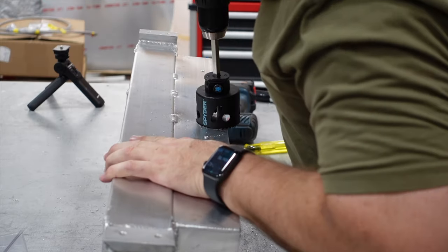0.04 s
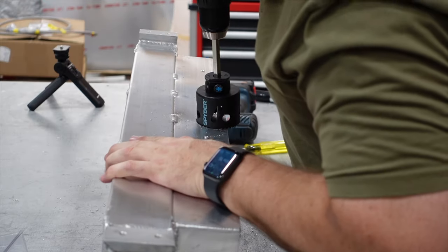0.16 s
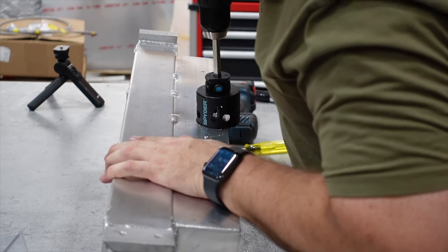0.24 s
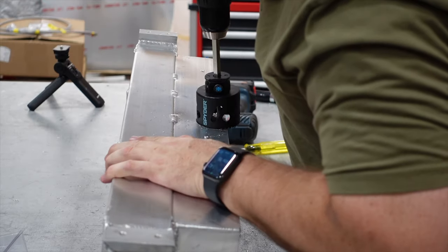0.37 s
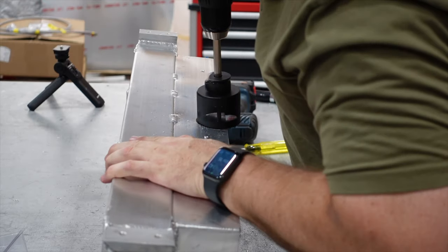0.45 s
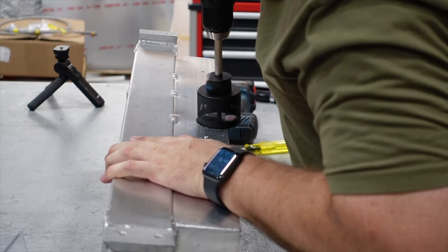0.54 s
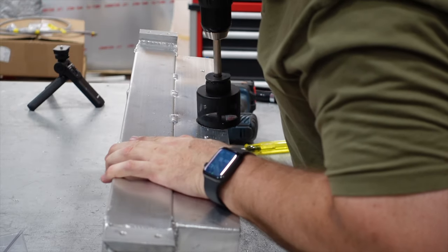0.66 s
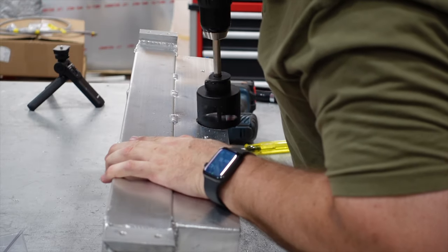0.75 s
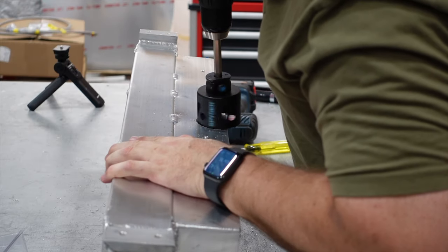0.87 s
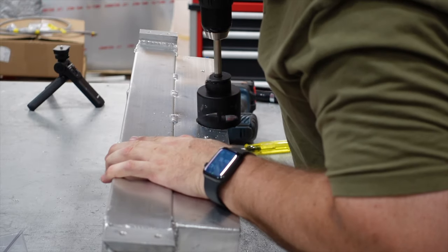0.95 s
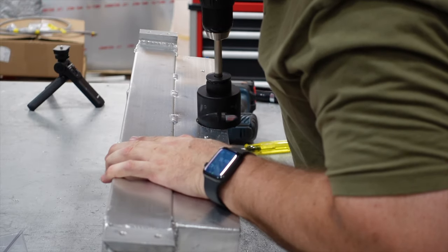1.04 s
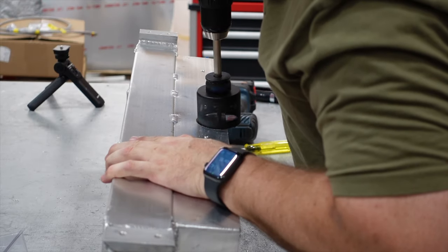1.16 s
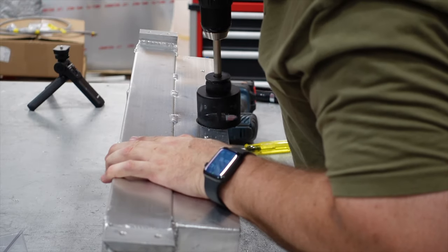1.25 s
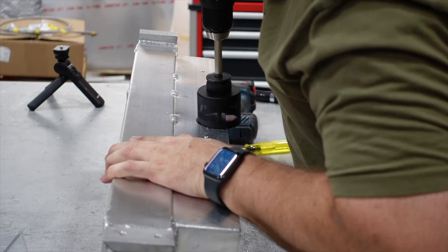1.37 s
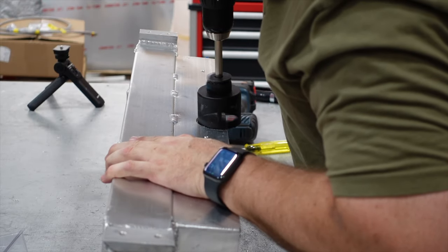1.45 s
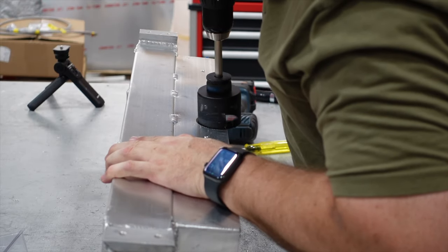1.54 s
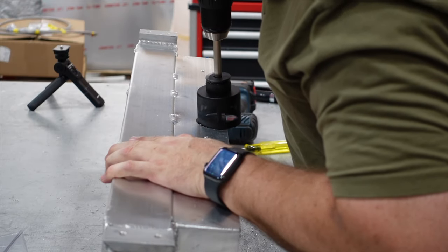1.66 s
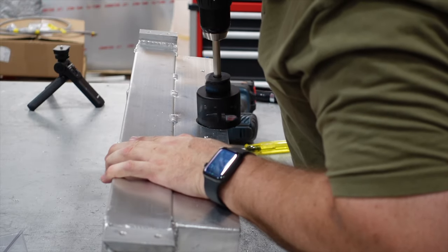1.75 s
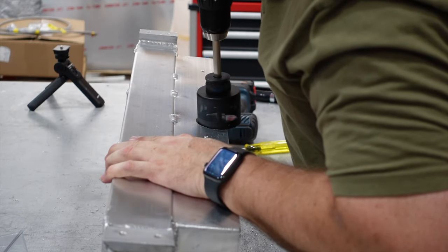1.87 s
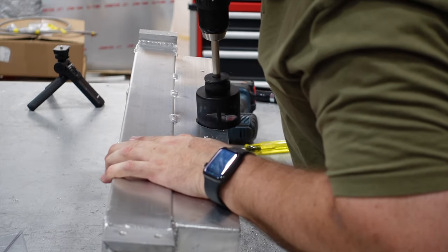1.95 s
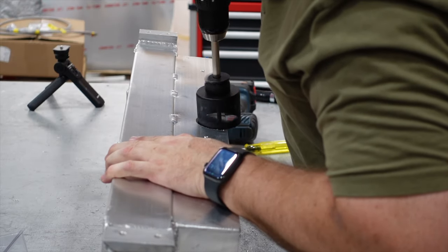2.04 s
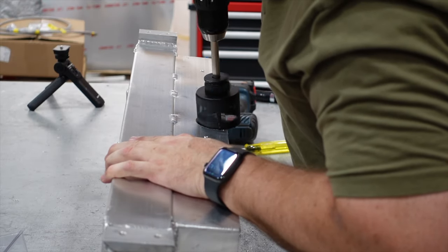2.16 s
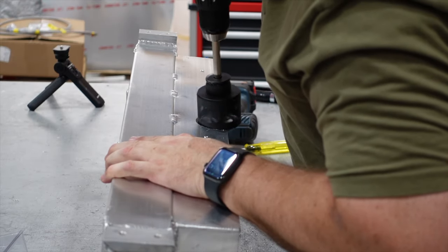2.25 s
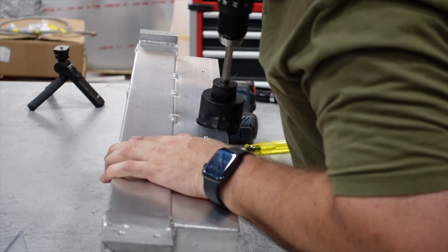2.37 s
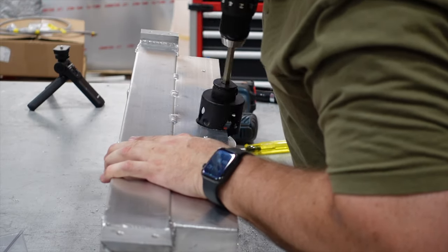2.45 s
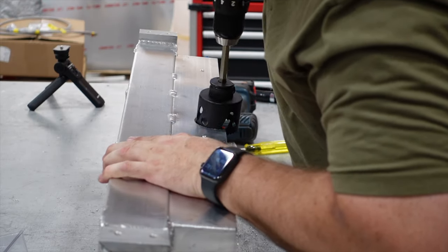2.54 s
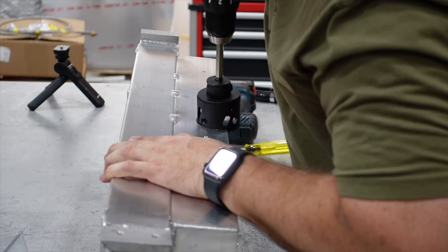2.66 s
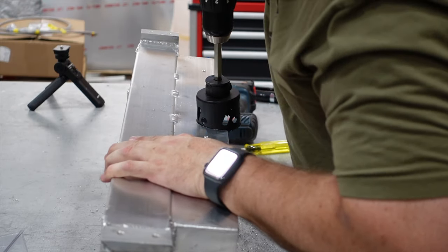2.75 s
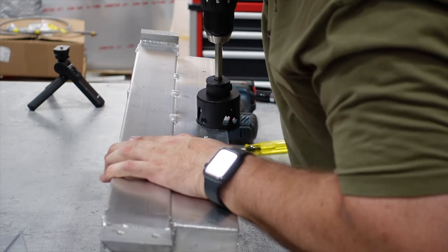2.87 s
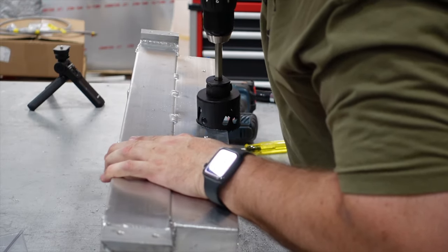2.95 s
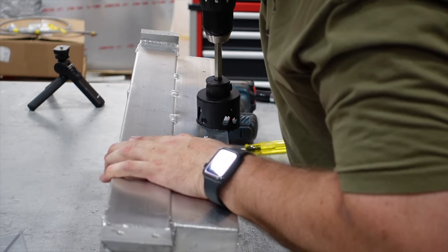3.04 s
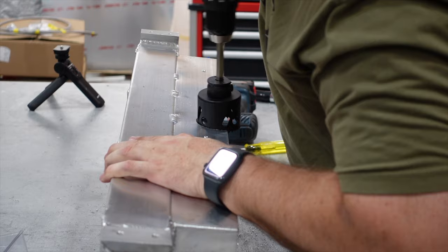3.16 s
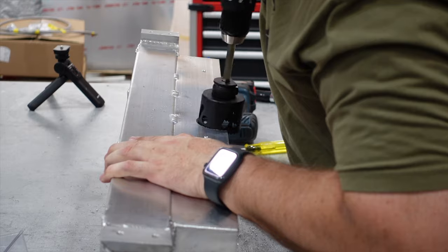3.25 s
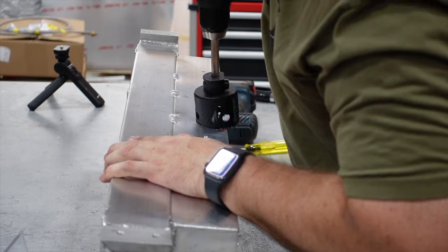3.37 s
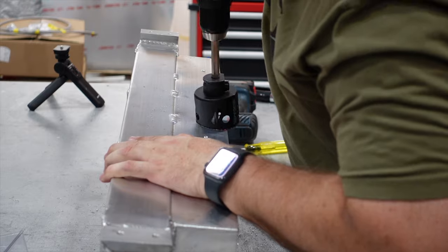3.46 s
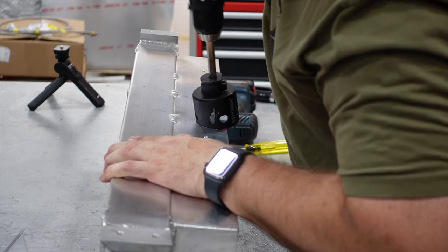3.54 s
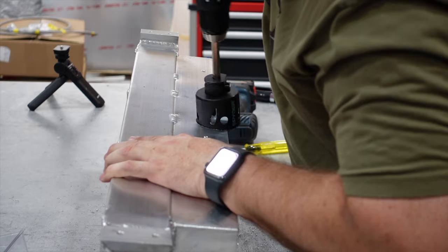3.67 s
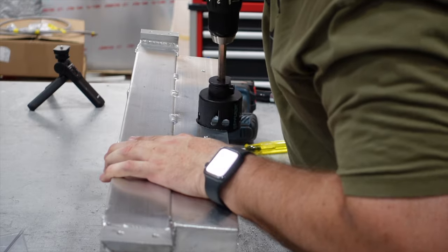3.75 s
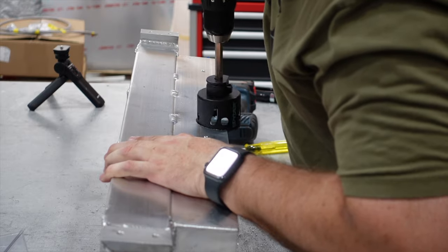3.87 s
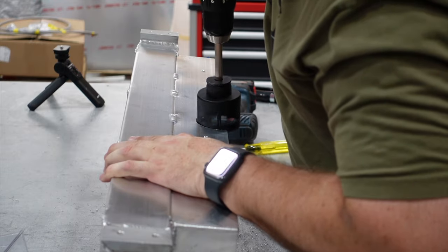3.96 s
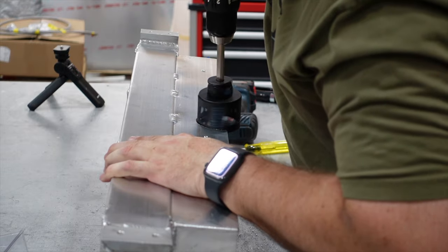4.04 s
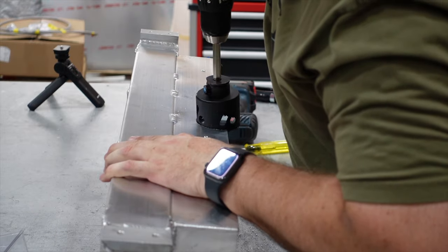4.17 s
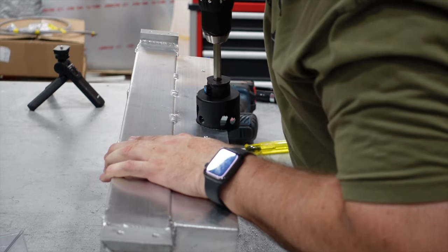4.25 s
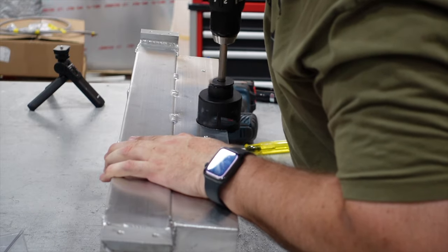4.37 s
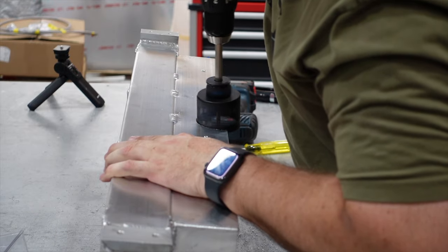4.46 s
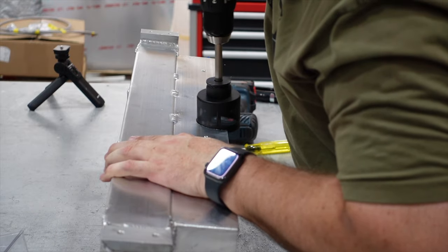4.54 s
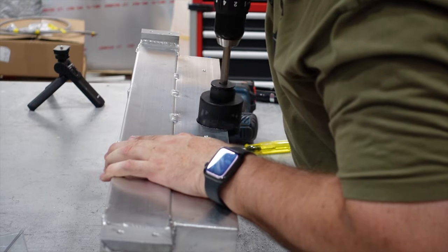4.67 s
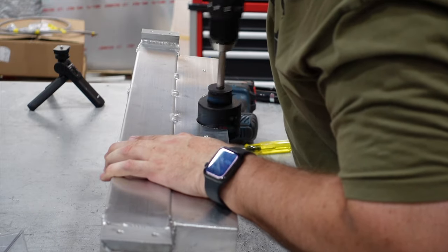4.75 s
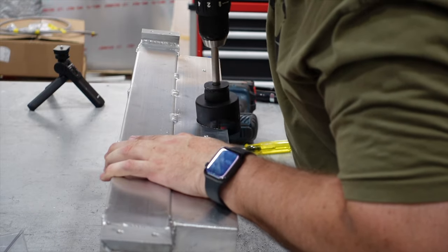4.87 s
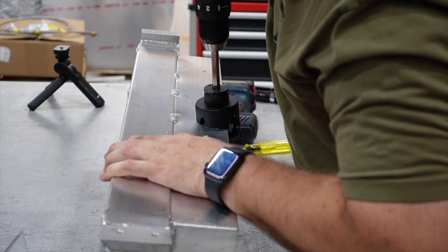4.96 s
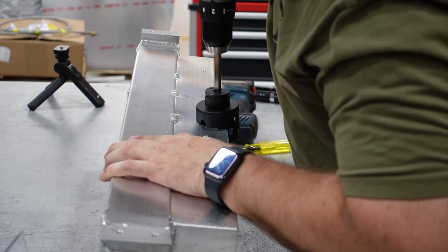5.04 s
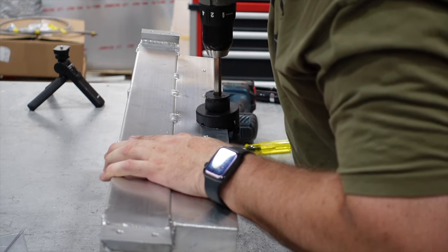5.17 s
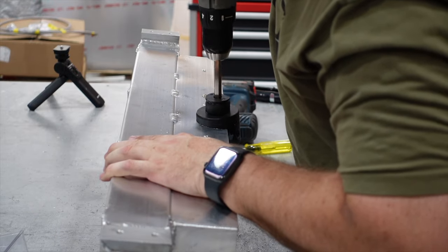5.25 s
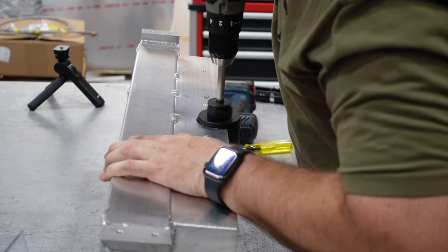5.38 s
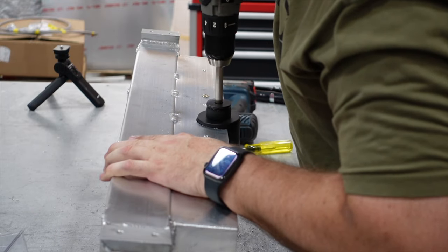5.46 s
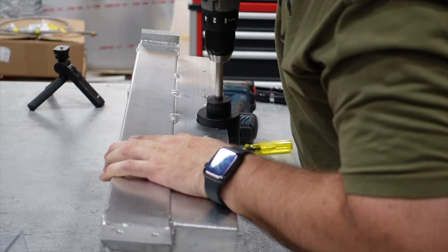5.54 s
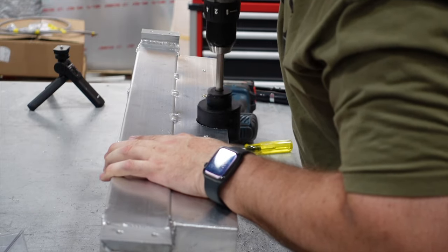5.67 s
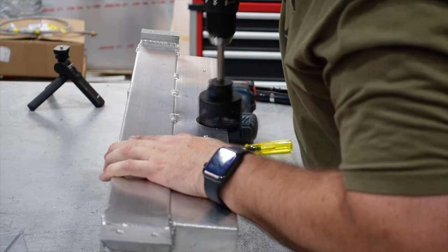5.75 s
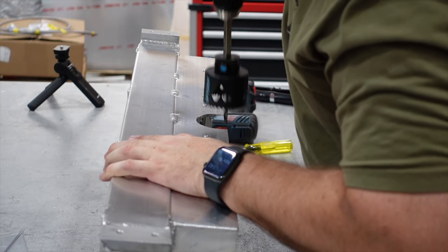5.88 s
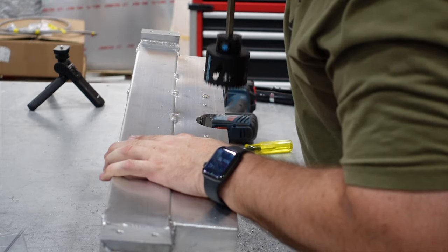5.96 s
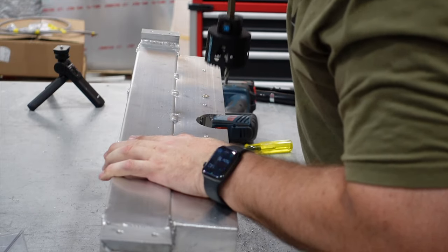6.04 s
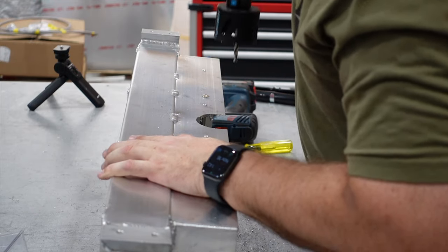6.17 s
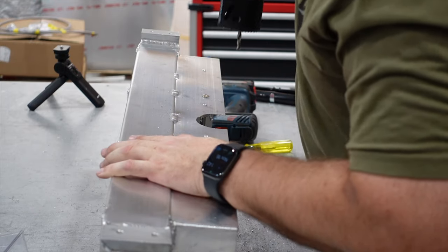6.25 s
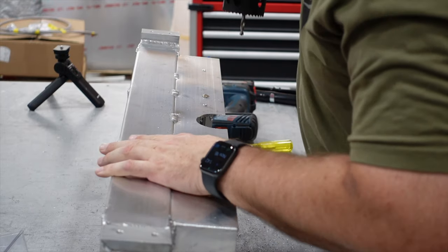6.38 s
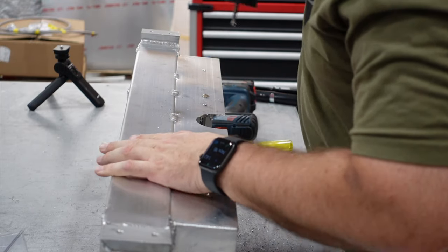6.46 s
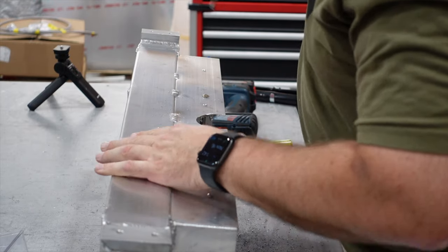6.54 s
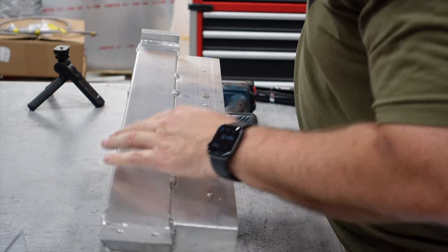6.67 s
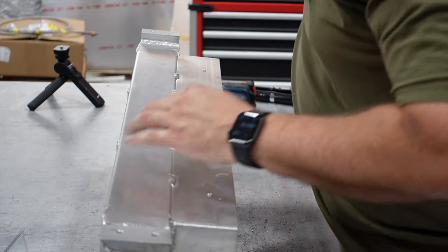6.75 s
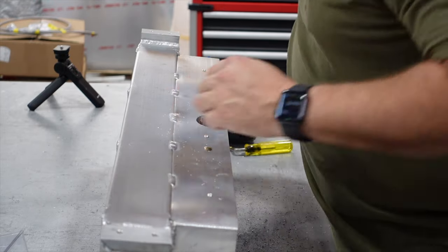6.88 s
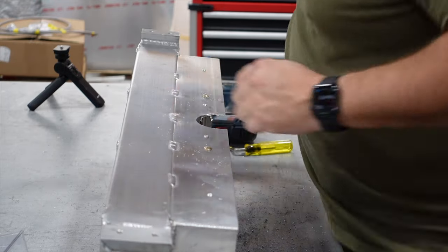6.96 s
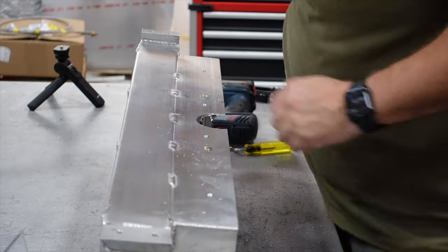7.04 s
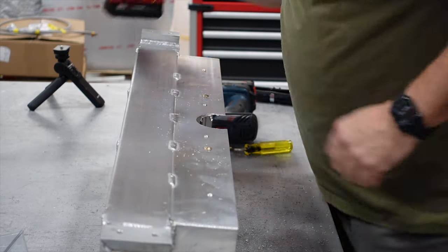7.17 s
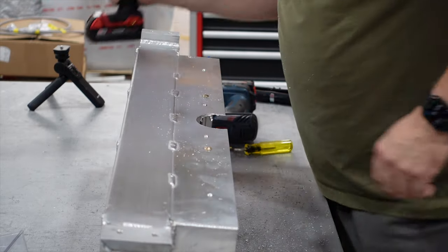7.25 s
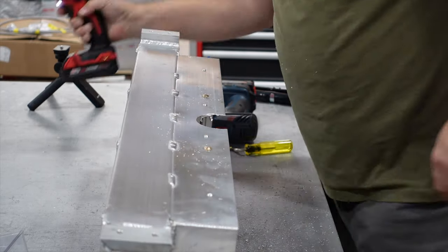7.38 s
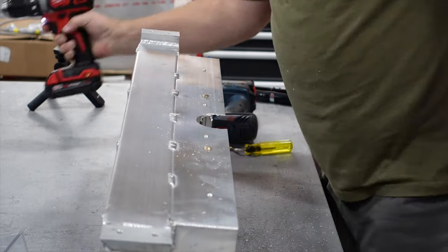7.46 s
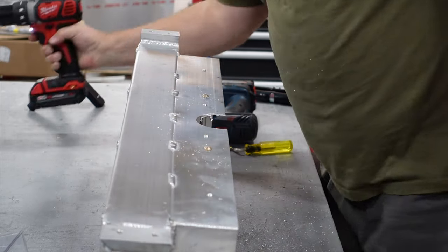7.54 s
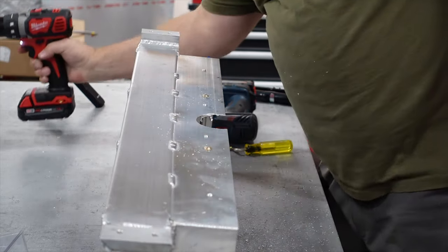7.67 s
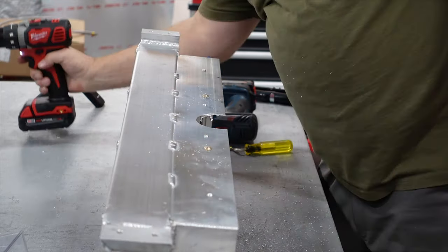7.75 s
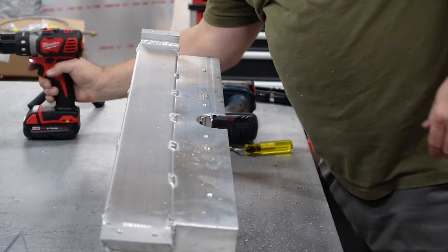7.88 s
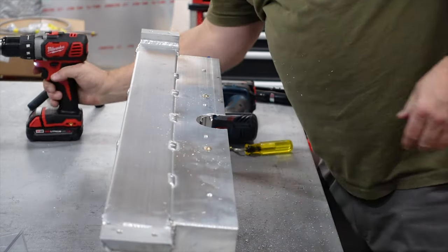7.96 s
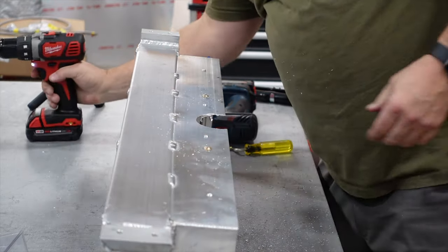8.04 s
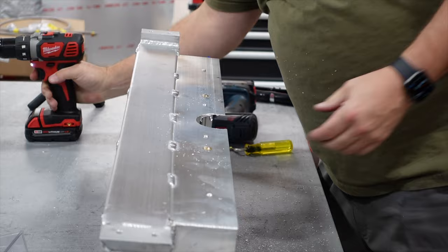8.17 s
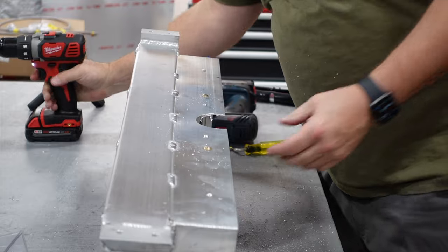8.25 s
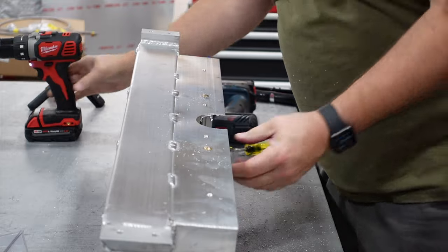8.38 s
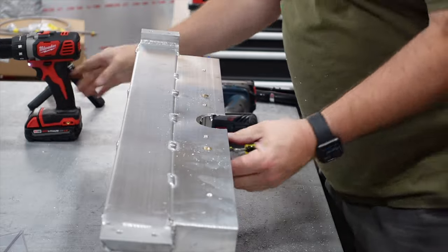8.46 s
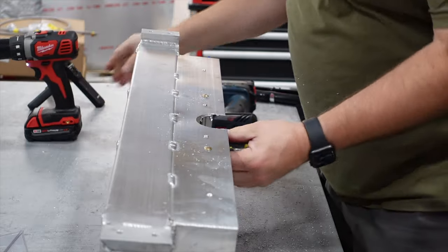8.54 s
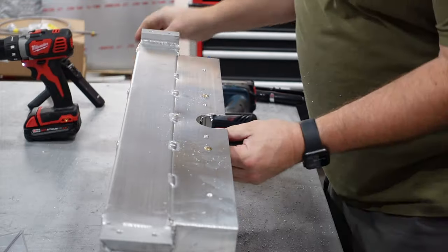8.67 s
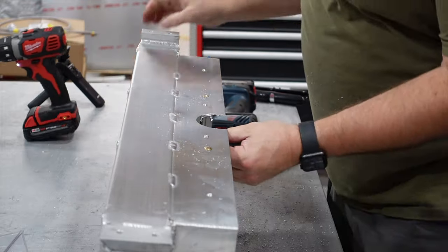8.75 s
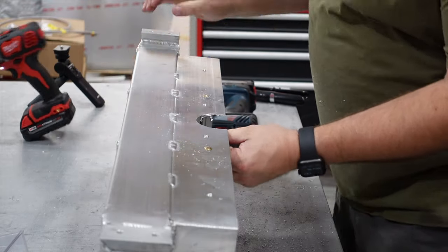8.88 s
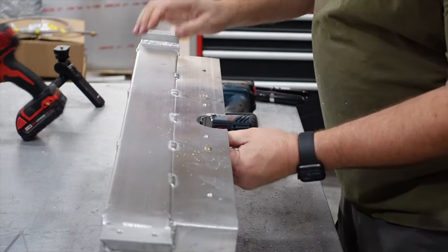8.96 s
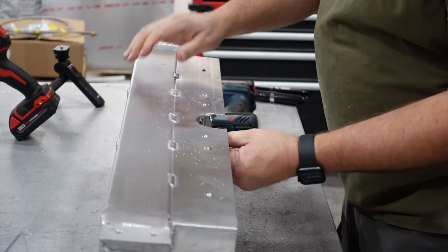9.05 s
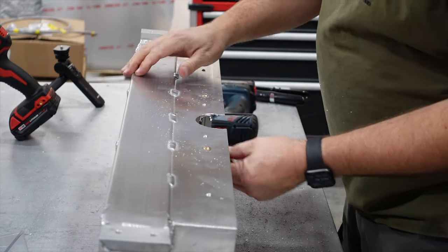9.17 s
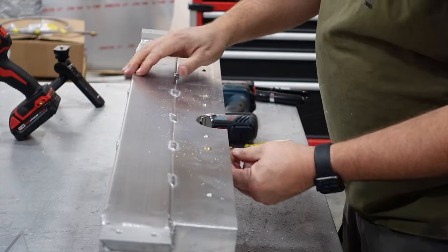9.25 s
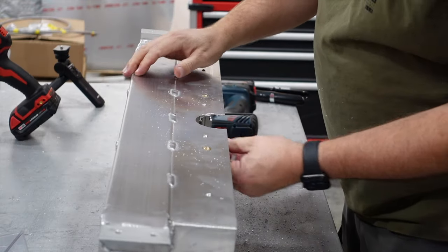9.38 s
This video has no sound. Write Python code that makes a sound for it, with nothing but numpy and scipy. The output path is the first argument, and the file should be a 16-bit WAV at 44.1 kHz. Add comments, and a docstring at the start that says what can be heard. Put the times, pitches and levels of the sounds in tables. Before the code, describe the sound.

In a slightly echoing workshop, a hole saw grinds through thin aluminum, its teeth tearing off chips with a bright hiss. The long first cut gives way to metallic clanks and bench thumps, then choppy bursts of cutting. A last, lighter cut ends in a sharp clank and a fading bell-like ring. Cloth rustles faintly, and the drill is put down with a couple of knocks before clattering over a second later.

```python
"""Hole saw through aluminium

A cordless drill drives a hole saw into a thin aluminium panel on a bench, in a hard-walled workshop.
The teeth rasp in three goes, shaking the panel and tearing off chips. They skid and clank in between,
then break through and leave the steel cup ringing. A sleeve brushes past, the drill is set down
on the bench, and a second later it topples."""
import sys
import numpy as np
from scipy import signal
from scipy.fft import rfft, irfft, next_fast_len
from scipy.io import wavfile
from scipy.ndimage import uniform_filter1d, map_coordinates

SR = 44100
rng = np.random.default_rng(int(sys.argv[2]) if len(sys.argv) > 2 else 0)


def output_pcm(signal):
    """Save a mono or channel-first signal as 16-bit PCM at the path in sys.argv[1].

    Samples are clipped to [-1, 1] before scaling.
    """
    pcm = np.clip(np.atleast_2d(signal).T, -1, 1) * 32767
    wavfile.write(sys.argv[1], SR, np.round(pcm).astype(np.int16))


N = 414981

# Pitches that the panel and the saw boost or weaken: f/Hz, width/Hz, gain/dB
PANEL_RESONANCES = [(94, 19, 13), (205, 92, 4.5), (323, 120, 3), (358, 8.3, 10), (482, 21, 8), (729, 38, 5),
                    (760, 35, -3), (887.6, 26, 8), (1005, 30, 4), (1281, 60, 6), (1582, 54, 5),
                    (2083, 37, -7), (2360, 150, 1.5), (2670, 280, -3.5), (3100, 200, 2), (4080, 50, -6.5),
                    (4440, 120, 1.5)]
SAW_RESONANCES = [(5060, 38, 6), (6120, 59, 7.5), (6680, 140, 9), (7100, 91, 7.5), (8420, 310, 3.5),
                  (10800, 530, 2.5), (12150, 510, 4), (13850, 490, 5.5), (14700, 200, 3), (15450, 300, 1.5)]
# Tone colour of tearing chips and of a clank: f/Hz, level/dB
CHIP_SPECTRUM = [(1000, -40), (3000, -2.5), (5200, 6.5), (6500, -2.5), (8300, 0.5), (9800, -2),
                 (12300, -5.5), (13200, -11.5), (16000, -11.5)]
CLANK_SPECTRUM = [(40, -30), (150, -1.5), (400, -2.5), (900, 6.5), (1500, 7.5), (3600, 3.5), (4800, -13),
                  (8000, -30.5), (15000, -36)]
# Each push on the drill: start/s, ease-off/s, grinding/dB, chips/dB, fade/(dB/s)
PUSHES = [(.443, 0.88, -14.5, -22.5, 232.5), (0.958, 2.42, -14.5, -21, 197),
          (2.386, 2.558, -18.5, -35, 52.5), (3.924, 4.078, -13.5, -21.5, 72.5),
          (4.321, 4.57, -15, -21, 399), (4.569, 4.741, -13, -17.5, 402.5),
          (4.755, 4.931, -16.5, -28.5, 192), (5.345, 5.782, -25.5, -35, 248),
          (5.768, 5.854, -20.5, -21.5, 124)]
# The knock on the saw's cup as it breaks through: t/s, level/dB
CUP_HITS = [(5.785, -24)]


def amp(db):
    """Turn decibels into a gain."""
    return 10 ** (np.asarray(db) / 20)


def unit(x):
    """Scale a signal to an average power of 1."""
    return x / np.sqrt(np.mean(x ** 2) + 1e-20)


def along(points, hz):
    """Read between (f/Hz, value) points on a logarithmic frequency axis."""
    freqs, values = np.transpose(points)
    return np.interp(np.log(hz + 1), np.log(freqs + 1), values)


def wobble(rate):
    """A smooth random curve through `rate` points a second."""
    points = rng.standard_normal(int(N * rate / SR) + 4)
    return map_coordinates(points, [np.arange(N) * rate / SR])


def coloured(x, spectrum, resonances=()):
    """Give a sound a broad tone colour with narrow peaks and dips on top."""
    size = 2 * next_fast_len(N // 2 + SR // 4)
    hz = np.fft.rfftfreq(size, 1 / SR)
    peaks = sum((amp(db) - 1) / (1 + (2 * (hz - f) / width) ** 2) for f, width, db in resonances)
    gain = unit(amp(along(spectrum, hz)) * (1 + peaks))
    # make the filter ring after a sound, never before it
    cepstrum = irfft(np.log(np.maximum(gain, 1e-6)))
    cepstrum[1:size // 2] *= 2
    cepstrum[size // 2 + 1:] = 0
    return irfft(rfft(x, size) * np.exp(rfft(cepstrum)))[:N]


def add(track, s, sound):
    """Mix a sound into a track at s seconds."""
    part = track[max(round(s * SR), 0):][:len(sound)]
    part += sound[:len(part)]


def swell(s, db, rise_db_per_s, fall_db_per_s):
    """A gain that grows to its peak at s seconds and dies away."""
    t = np.arange(N) / SR - s
    slope_db = np.minimum(rise_db_per_s * t, -fall_db_per_s * t)
    return amp(db + np.maximum(slope_db, -120))


def push(start, end, fade_db_per_s, bite_s=.026):
    """The gain of one push: the teeth take hold, cut evenly, then fade as the pressure comes off."""
    t = np.arange(N) / SR
    grip = np.clip((t - start) / bite_s, 0, 1) ** 2
    return grip * amp(-fade_db_per_s * np.maximum(t - end, 0))


def rub(gain, spectrum, resonances, uneven_db, rate):
    """Uneven rubbing noise that follows a gain."""
    strokes = unit(rng.standard_normal(N) * amp(uneven_db * wobble(rate)))
    return coloured(gain * strokes, spectrum, resonances)


def room_air():
    """The room's faint, steady rumble."""
    spectrum = [(20, 1.5), (78, -1.5), (170, -9), (367, -25.5), (1140, -22), (2480, -29.5), (4000, -37),
                (5500, -40), (15000, -49.5)]  # tone colour: f/Hz, level/dB
    return amp(-61) * coloured(rng.standard_normal(N), spectrum)


def workshop(direct, gap_s=.004):
    """A sound plus its echo from the hard walls; the highest treble dies first."""
    echo_times = [(60, 0.74), (160, 0.6), (420, 0.42), (1200, 0.87), (3500, 0.89), (5000, 0.89),
                  (8000, 0.5), (15000, .28)]  # f/Hz, time to fade by 60 dB (t60)/s
    echo_levels = [(100, 2), (400, -4), (3500, -8.5), (5500, -12), (14000, -8)]  # f/Hz, echo over direct sound/dB
    hz, t, noise = signal.stft(rng.standard_normal(SR), SR, nperseg=256)
    decay = amp(-60 * t / along(echo_times, hz)[:, None])
    decay /= np.sqrt(np.mean(decay ** 2, axis=1, keepdims=True) * SR)
    tail = signal.istft(noise * decay * amp(along(echo_levels, hz))[:, None], SR, nperseg=256)[1]
    echo = signal.fftconvolve(direct, np.pad(tail, (int(gap_s * SR), 0)))[:N]
    return (direct + echo) / np.sqrt(2)


def handling():
    """A sleeve brushes by, the saw scuffs the panel and the bench rocks under a shifting load."""
    # Each movement: peak/s, level/dB, rise/(dB/s), fall/(dB/s)
    brushes = [(7.46, -50.5, 64, 92), (8.5, -70, 40, 34)]
    scuffs = [(0, -41, 300, 114), (2.85, -42.5, 197, 69), (3.85, -57, 39, 100)]
    rocks = [(.05, -60.5, 51, 5), (3.302, -33, 185.5, 29.5), (8.15, -34, 200, 133.5), (8.5, -55.5, 70, 28),
             (9.151, -30, 260, 73.5)]
    # Tone colour of cloth and bench: f/Hz, level/dB
    cloth_spectrum = [(150, -24), (300, -10), (500, -6), (800, -7.5), (1500, -2), (3500, 0), (6000, -16),
                      (14000, -28)]
    thud_spectrum = [(25, -12.5), (55, -6.5), (85, 1.5), (130, -16), (210, -2), (340, -7.5), (480, -6.5),
                     (800, -14), (2500, -74)]
    brush, scuff, rock = (sum(swell(*row) for row in rows) for rows in (brushes, scuffs, rocks))
    sleeve = coloured(brush * rng.standard_normal(N), cloth_spectrum)
    panel = rub(scuff, CLANK_SPECTRUM, PANEL_RESONANCES, uneven_db=5.5, rate=17)
    bench = rub(rock, thud_spectrum, PANEL_RESONANCES[:1], uneven_db=5, rate=9.6)
    return sleeve + panel + bench


def contacts(rattle_t60_s=.11, gap_scatter=.08, scatter_octaves=.4):
    """List every blow: single knocks, and clatters whose weakening knocks rock the bench to and fro."""
    # The tool hits panel and bench: t/s, clank/dB, crack/dB, rattle t60/s, thump/dB, thump/Hz
    knocks = [(.361, -52, -67, .04, -55, 119.2), (.418, -50, -55.5, 0.2, -59, 150),
              (2.756, -12, -11, 0.071, -41.5, 301.6), (2.9, -29, -24.5, 0.092, -76, 290),
              (2.976, -27.5, -28, 0.072, -40, 160), (3.239, -27, -34.5, 0.19, -24.5, 92),
              (3.323, -36.5, -45, 0.19, -27, 70.5), (3.348, -18, -24.5, 0.14, -21, 235),
              (3.37, -21.5, -46.5, 0.17, -18, 85.4), (3.945, -6, -13.5, 0.09, -28.5, 206),
              (4.155, -16, -25.5, 0.19, -19, 126), (4.348, -7, -13.5, 0.037, -27, 130),
              (4.506, -16, -3, 0.023, -30.5, 199), (4.893, -7, -14, .05, -37, 198),
              (5.308, -35.5, -40, 0.15, -54.5, 199), (5.352, -15.5, -21.5, .3, -12.5, 233),
              (5.412, -12.5, -14.5, 0.076, -27.5, 270), (5.636, -6.5, -8, 0.035, -37, 199),
              (5.703, -19, -16.5, 0.081, -41, 200.5), (5.784, 1.5, 0, 0.034, -31, 178.5),
              (7.853, -37.5, -51, 0.38, -17, 218), (7.967, -30.5, -50, 0.13, -14.5, 141)]
    # The drill clatters: t/s, length/s, gap/s, clank/dB, crack/dB, thump/dB, loss/(dB/s)
    clatters = [(3.589, .09, 0.035, -39.5, -53.5, -35, 10), (7.984, .085, .024, -22, -34, -18, 46),
                (9.016, .1, .015, -13.5, -22.5, -7, 83)]
    hits = list(knocks)
    for start, length, gap, clank_db, crack_db, thump_db, loss in clatters:
        for k, late in enumerate(np.arange(0, length, gap)):
            slip, tilt = rng.uniform(-1, 1, 2)
            s = start + late + gap_scatter * min(late, gap) * slip
            hz, tone_db = (100, -3.5) if k % 2 else (252, 0)  # the bench's two tones take turns
            lost_db = loss * late
            hits.append((s, clank_db - lost_db, crack_db - lost_db, rattle_t60_s,
                         thump_db + tone_db - lost_db, hz * 2 ** (scatter_octaves * tilt)))
    return hits


def bench_thumps(hits, life_cycles=8.03, boxy_db=-8):
    """Each blow shakes the bench for a few cycles and stirs its hollow body."""
    hollow = [(40, -12.5), (100, -6.5), (350, 0), (600, -9.5), (1200, -27), (3000, -57.5)]  # f/Hz, dB
    tone, stir = np.zeros((2, N))
    t = np.arange(SR // 3) / SR
    for s, _, _, _, db, hz in hits:
        cycles = hz * t
        envelope = amp(db + 13 - 60 * cycles / life_cycles) * (1 - np.exp(-cycles ** 2))
        add(tone, s, envelope * np.sin(2 * np.pi * cycles))
        add(stir, s, envelope * rng.standard_normal(len(t)))
    return tone + amp(boxy_db) * coloured(stir, hollow)


def clanks(hits, attack_s=.0029, first_db=-3, first_s=.0041):
    """Each blow is a hard first touch and a brief rattle: the panel clanks and the steel cracks."""
    clank, crack = np.zeros((2, N))
    t = np.arange(SR // 3) / SR
    onset = (1 + amp(first_db) * np.exp(-t / first_s)) * (1 - np.exp(-t / attack_s))
    for s, clank_db, crack_db, t60, _, _ in hits:
        rattle = rng.standard_normal((2, len(t))) * onset * amp(-60 * t / t60)
        add(clank, s, amp(clank_db) * rattle[0])
        add(crack, s, amp(crack_db) * rattle[1])
    jolts = unit(amp(wobble(600)))  # the touches come in clumps of a millisecond or two
    panel = amp(2.5) * coloured(clank * jolts, CLANK_SPECTRUM, PANEL_RESONANCES)
    return panel + amp(-4) * coloured(crack * jolts, CHIP_SPECTRUM, SAW_RESONANCES)


def ring(tones, hits, split_hz, twin_gain, attack_s=.00055):
    """Struck steel: each tone has a slightly out-of-tune twin, so the pair pulses."""
    track, t = np.zeros(N), np.arange(3 * SR) / SR
    attack = 1 - np.exp(-t / attack_s)
    for s, hit_db in hits:
        for hz, tone_db, t60 in tones:
            scatter_db, detune, phase = rng.standard_normal(3)
            twin_hz = hz + split_hz * (1 + .4 * detune)
            pair = np.sin(2 * np.pi * hz * t) + twin_gain * np.sin(2 * np.pi * twin_hz * t + .5 * phase)
            add(track, s, amp(hit_db + tone_db + scatter_db - 60 * t / t60) * pair * attack)
    return track


def cup_bell(hz=1416, beat_hz=1.2, silent_at_s=6.1, t60=2.9):
    """Two close tones of the cup make one bell note that swells and vanishes as it dies away."""
    t = np.arange(N) / SR
    age = np.maximum(t - CUP_HITS[0][0], 0)
    beat = np.sin(np.pi * beat_hz * (t - silent_at_s))
    return amp(-28.5 - 60 * age / t60) * beat * np.sin(2 * np.pi * hz * age)


def ringing_steel():
    """Rim, guide bit, cup and chuck ring when knocked; the cut-out disc rings as it comes loose."""
    # Each part's own tones: f/Hz, level/dB, t60/s
    rim = [(887, 2, 0.86), (954, 9, 0.22), (1585, -22.5, 1.4), (1830, -6.5, 2.4), (2042, -1.5, 0.47),
           (3550, -14, 0.56), (4940, -7, 0.83), (6600, -12, 0.72), (7650, -2.5, 0.82), (8740, -4, 0.66),
           (11040, 1, 0.33), (12600, -16.5, 0.41), (13920, -7, 0.6)]
    teeth = [(2213, -17, 1), (3488, -17, .9), (4619, -13, 1.6), (6831, -15, .5), (8330, 0, .12),
             (8560, -3, .2), (10998, -4, .2), (12430, -9, .25), (13700, -12, .2)]
    bit = [(7337, -2, .48), (10090, -16, .4), (12070, -12, .34), (13130, -2, .26), (14760, -13, .24)]
    cup = [(172, -18, 2.2), (466, -3, 1.05), (1023, -11, 1.2), (1050, -12, 1.1), (1507, -23, 2.8),
           (1830, -14, 1.4), (2643, 2, 1.2), (2660, -23, 4), (2686, -23, 5), (2772, -8, 1.3),
           (4344, -1, 1.1), (4346, -20, 4.2), (4525, 1, 1.3), (6778, -4, .85)]
    chuck = [(342, 1, 1.4), (2686, -13, 4.5), (2772, -8, 2.4), (6702, -8, .8), (7074, -11, .7),
             (10200, -4, .3), (10520, -4, .43)]  # the drill's clamp
    # What sets them ringing: t/s, level/dB
    rim_hits = [(2.758, -28.5), (2.902, -43)]
    slug_hits = [(4.931, -26.5)]
    bit_hits = [(5.412, -23), (5.689, -31), (5.976, -36)]
    chuck_hits = [(7.858, -54), (9.021, -34.5)]
    return (ring(rim, rim_hits, split_hz=17, twin_gain=.53)
            + ring(teeth, slug_hits, split_hz=22, twin_gain=.93)
            + ring(bit, bit_hits, split_hz=14, twin_gain=.98)
            + ring(cup, CUP_HITS, split_hz=7.7, twin_gain=.29) + cup_bell()
            + ring(chuck, chuck_hits, split_hz=6.5, twin_gain=.3))


def panel_groan():
    """The panel bends and groans as the teeth take hold, drag or let go."""
    groans = [(.51, -23.5), (.86, -17.5), (1.46, -23), (2.52, -18), (3.99, -19.5), (4.13, -29.5),
              (4.42, -25.5), (4.57, -23.5), (4.92, -25.5)]  # swells: t/s, level/dB
    bending = [(326, 20, 27.5), (356, 15, 25), (470, 18, 19.5)]  # the panel's bending tones: f/Hz, width/Hz, gain/dB
    spectrum = [(150, -29), (300, 1.5), (480, 6.5), (800, -27.5)]  # f/Hz, level/dB
    touching = np.max([push(start, end, fade_db_per_s=60) for start, end, *_ in PUSHES], axis=0)
    swells = sum(swell(s, db, rise_db_per_s=130, fall_db_per_s=94) for s, db in groans)
    drag = touching * (amp(-39) + swells)
    return amp(-2.5) * coloured(drag * rng.standard_normal(N), spectrum, bending)


def disc_chatter():
    """The nearly free disc of aluminium chatters in the cut."""
    spells = [(4.424, 4.907, -23.5), (5.389, 5.74, -27.5)]  # when it chatters: start/s, end/s, level/dB
    resonances = [(1280, 110, 12.5), (1636, 91, 22), (2600, 66, 16), (4886, 20, 23.5)]  # the disc's tones: f/Hz, width/Hz, gain/dB
    spectrum = [(700, -28), (1300, -4), (2700, 4.5), (4700, -9), (7000, -26.5)]  # f/Hz, level/dB
    loose = sum(amp(db) * push(start, end, fade_db_per_s=300) for start, end, db in spells)
    return rub(loose, spectrum, resonances, uneven_db=2, rate=33)


def turns():
    """How many turns the saw has made at each sample."""
    speeds = [(.44, 14), (.55, 23), (2.4, 23), (2.75, 12), (3.92, 16), (4.05, 23), (4.9, 24), (5.3, 18),
              (5.48, 22), (5.55, 23.6), (5.68, 24.6), (5.95, 22)]  # t/s, turning speed/(turns/s)
    return np.cumsum(np.interp(np.arange(N) / SR, *np.transpose(speeds))) / SR


def motor_whine(cycles_per_turn=450):
    """The motor's thin whine shows while the saw runs light, just before it breaks through."""
    fade = np.interp(np.arange(N) / SR, [5.46, 5.52, 5.66, 5.76], [0, 1, .7, 0])
    phase = 2 * np.pi * cycles_per_turn * turns() + .82 * wobble(249)
    return amp(-42) * fade * (np.sin(phase) + .56 * np.sin(phase / 2))


def cutting_gains(chip_fade_ratio=2.1):
    """Each push drives grinding and chips; the chips stop sooner, and snags add bursts of them."""
    snags = [(.655, -12.5), (0.969, -23), (1.21, -20.5), (1.698, -20), (2.225, -17.5), (4.734, -22),
             (4.931, -15.5)]  # a tooth rips out a larger chip: t/s, level/dB
    grind = sum(amp(db) * push(start, end, fade) for start, end, db, _, fade in PUSHES)
    chips = sum(amp(db) * push(start, end, chip_fade_ratio * fade) for start, end, _, db, fade in PUSHES)
    bursts = sum(swell(s, db, rise_db_per_s=3500.5, fall_db_per_s=1102) for s, db in snags)
    return grind, chips + bursts


def tooth_bites(teeth=24, scatter=.3, chip_s=.0015):
    """Each tooth catches a little early or late (a click) and tears off a chip (a burst of noise)."""
    due = np.flatnonzero(np.diff(np.floor(turns() * teeth)))
    slip = scatter * np.gradient(due) * rng.standard_normal(len(due))
    at = np.clip(due + slip, 0, N - 1).astype(int)
    strength_db = np.clip(rng.standard_normal(len(at)), -2, 2)
    catches = np.bincount(at, amp(strength_db), N)
    tearing = signal.lfilter([1], [1, -np.exp(-1 / (chip_s * SR))], catches)
    return unit(catches), unit(tearing * rng.standard_normal(N))


def hole_saw(grind_throb_db=.1, grind_snag_db=1.08, chip_throb_db=2.2, chip_snag_db=2):
    """Teeth shake the panel and tear chips; the cup runs off centre and digs in once a turn."""
    grind_gain, chip_gain = cutting_gains()
    throb = np.sin(2 * np.pi * turns() + 1.4 * wobble(14))
    snag = wobble(150)
    snag = unit(snag - uniform_filter1d(snag, size=3000))  # steady feed evens it out in a turn or two
    catches, tearing = tooth_bites()
    rasp = unit((.82 * catches + tearing) * amp(grind_throb_db * throb + grind_snag_db * snag))
    fizz = unit((tearing + rng.standard_normal(N)) * amp(chip_throb_db * throb + chip_snag_db * snag))
    grind_spectrum = [(30, -24.5), (60, -18.5), (95, -11), (150, -9), (300, -4), (560, -5.5), (900, 0),
                      (1400, 3), (2000, 1.5), (3600, 2.5), (4600, -4.5), (7000, -11.5), (15000, -44.5)]  # tone colour: f/Hz, level/dB
    grinding = amp(1.5) * coloured(grind_gain * rasp, grind_spectrum, PANEL_RESONANCES)
    return grinding + amp(1) * coloured(chip_gain * fizz, CHIP_SPECTRUM, SAW_RESONANCES)


def scene():
    """Saw, clanks and handling fill the room; steel, bench, groan and chatter are heard mostly direct."""
    hits = contacts()
    steel, bench = ringing_steel(), bench_thumps(hits)
    panel = panel_groan() + disc_chatter()
    air = room_air()
    work = hole_saw() + motor_whine() + clanks(hits) + handling()
    in_room = workshop(work + .26 * steel + .31 * bench + .49 * panel)
    direct = .6 * steel + .7 * bench + .46 * panel
    return (air + in_room + direct)[None]


def record(dry, ceiling=.76, top_hz=15850):
    """Round off the highest peaks and cut the very top of the treble steeply."""
    rounded = dry / (1 + np.abs(dry / ceiling) ** 5) ** (1 / 5)
    size = next_fast_len(N + SR // 2)
    low_pass = 1 / (1 + (np.fft.rfftfreq(size, 1 / SR) / top_hz) ** 220)
    return irfft(rfft(rounded, size) * low_pass, size)[..., :N]


dry = scene()
out = record(dry)
output_pcm(out)
```